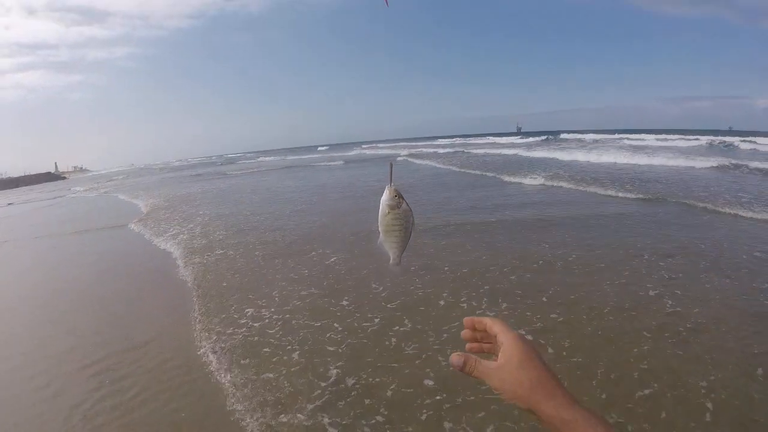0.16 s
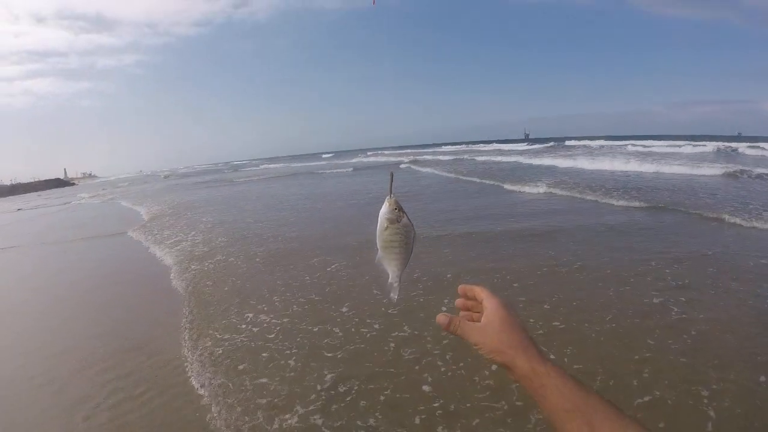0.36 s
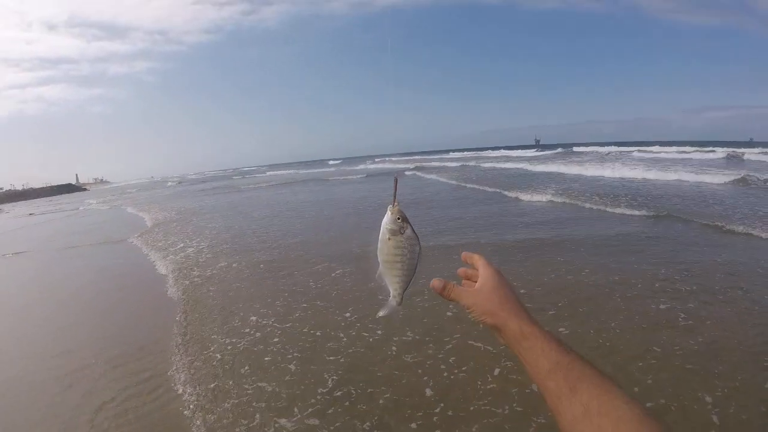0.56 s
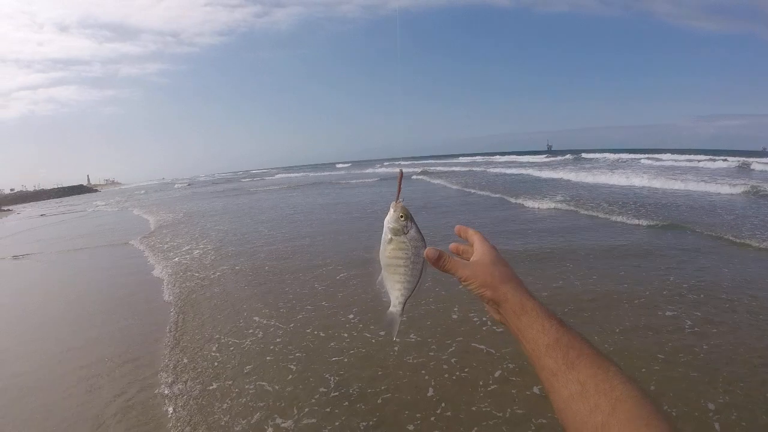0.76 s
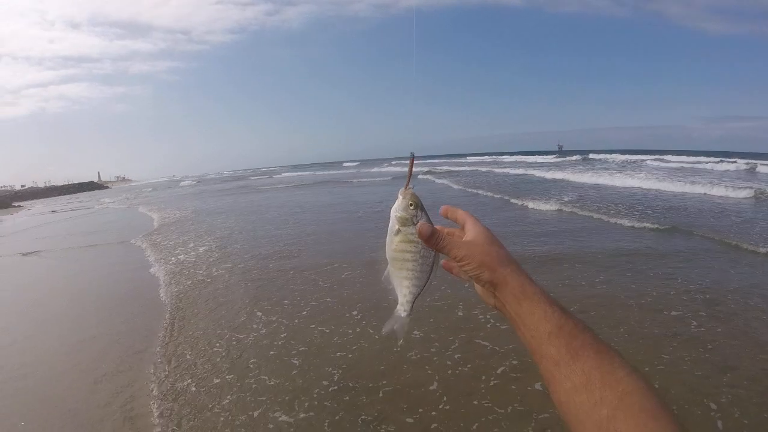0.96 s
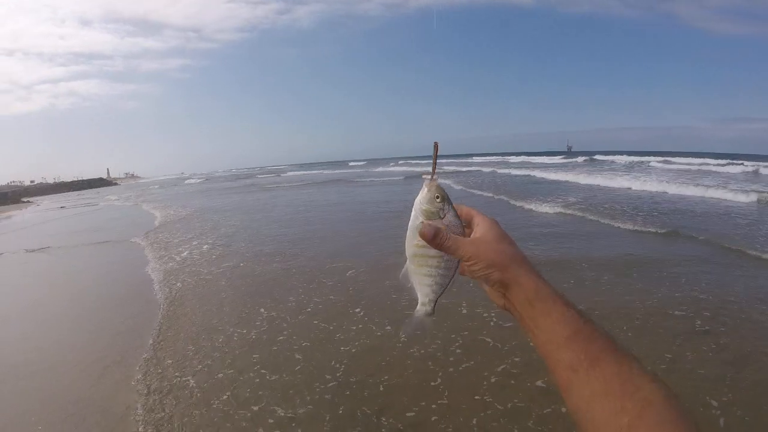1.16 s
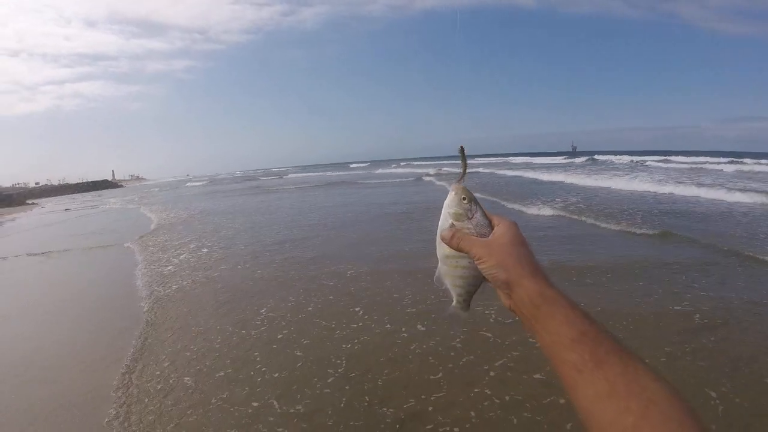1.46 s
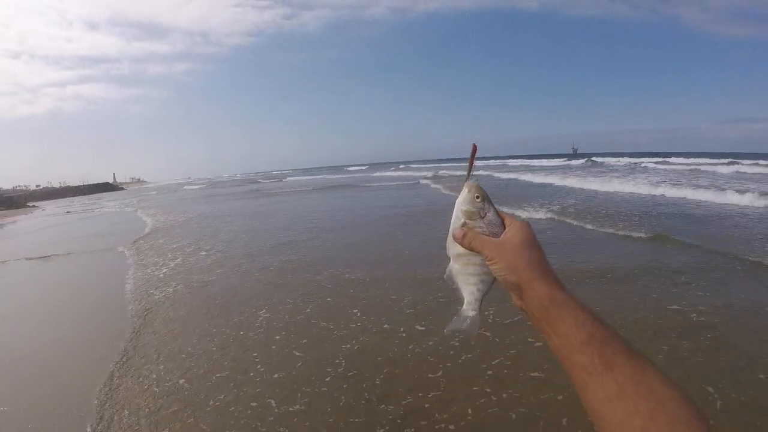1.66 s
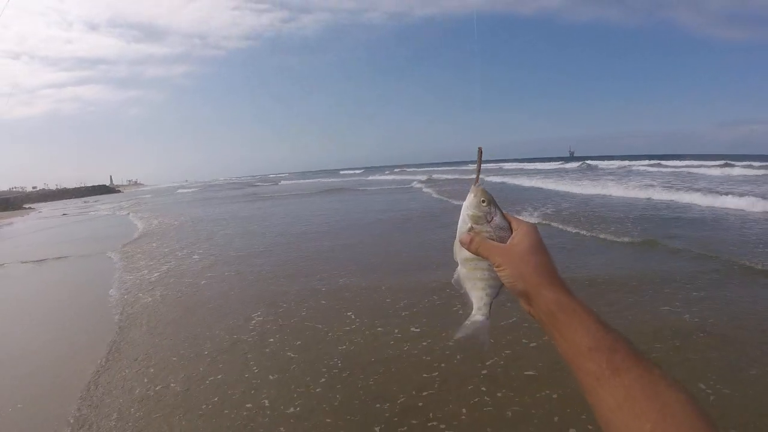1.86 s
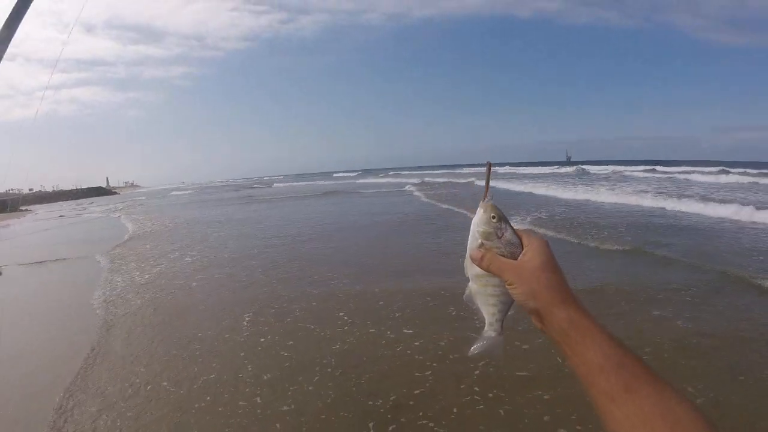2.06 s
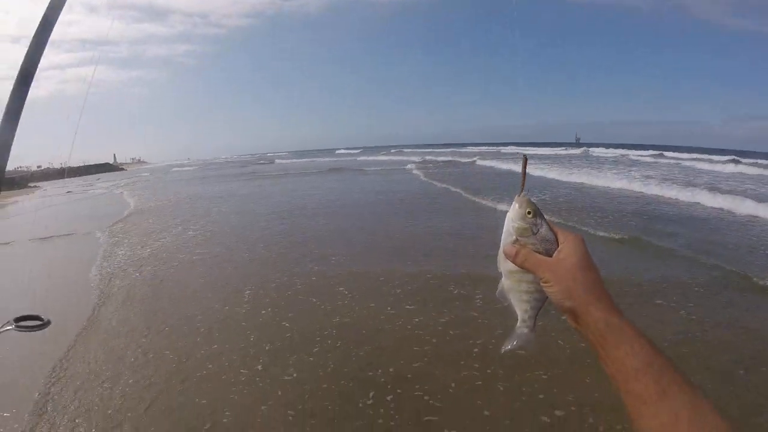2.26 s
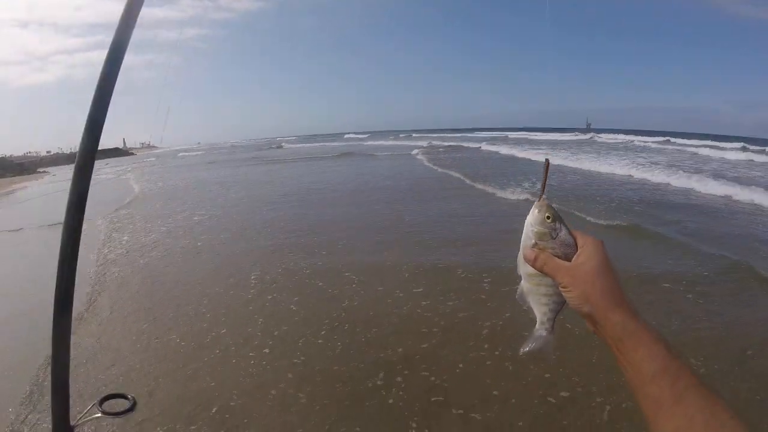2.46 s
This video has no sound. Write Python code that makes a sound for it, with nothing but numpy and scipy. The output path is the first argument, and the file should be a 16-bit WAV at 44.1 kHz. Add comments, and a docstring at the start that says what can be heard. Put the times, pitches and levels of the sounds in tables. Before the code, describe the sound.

Heavy wind rumble and rapid bumps on the microphone, with dull surf roar and a fading foam wash

```python
"""A flat sandy beach, heard at the water's edge through a microphone in a housing.
Far breakers roar steadily as churning noise; a thin sheet of foam washes in, fizzes and fades.
The fizz is a crowd of tiny ringing bubbles. Wind rumbles on the microphone port, where eddies
strike as low, fluttering bumps and small ones burst in sharp puffs, all shaped from noise."""
import sys
import numpy as np
from scipy import signal
from scipy.fft import rfft, irfft
from scipy.io import wavfile
from scipy.ndimage import map_coordinates

SR = 44100
rng = np.random.default_rng(int(sys.argv[2]) if len(sys.argv) > 2 else 0)


def file_out(sig):
    """Save sig as 16-bit WAV at sys.argv[1]."""
    # one column per channel
    cols = np.atleast_2d(sig).T
    # limit, then scale
    lim = np.clip(cols, -1, 1)
    pcm = np.round(lim * 32767).astype(np.int16)
    wavfile.write(sys.argv[1], SR, pcm)


N = 114660  # length in samples

# Spectrum of the far breakers. Each row: frequency in Hz, relative density in dB per Hz.
BREAKER_SPECTRUM = [(40, -4), (150, 3.5), (450, -4), (800, -8.5), (1500, -12), (2800, -19.5), (4200, -23.5),
                    (7000, -26.5), (11000, -26.5), (15000, -35)]
# Spectrum of foam washing over sand. Each row: frequency in Hz, relative density in dB per Hz.
WASH_SPECTRUM = [(150, 5), (500, 5.5), (1000, -0.5), (1800, -4), (2900, -9), (4200, -16), (7000, -18),
                 (11000, -16), (15000, -20)]
# Strength of the wash as it comes and goes. Each row: time in seconds, level in dB.
WASH_STRENGTH = [(0, -34.5), (.13, -32), (.27, -32.5), (.42, -29.5), (.76, -27.5), (.93, -31),
                 (1.05, -34.5), (1.24, -32.5), (1.46, -38.5), (1.7, -50), (1.92, -41.5), (2.15, -48),
                 (2.48, -36.5), (2.6, -40)]
# Spectrum of steady wind on the port. Each row: frequency in Hz, relative density in dB per Hz.
RUMBLE_SPECTRUM = [(10, -25.5), (24, -2.5), (34, 1.5), (52, 0), (80, -5.5), (130, -14.5), (220, -21),
                   (400, -35), (1000, -64.5)]
# Strength of the wind rumble. Each row: time in seconds, level in dB.
WIND_STRENGTH = [(0, -26), (.1, -19.5), (.36, -20.5), (.55, -12.5), (.75, -16.5), (.87, -19), (1.0, -13),
                 (1.17, -17.5), (1.3, -13.5), (1.6, -13), (1.79, -17), (1.94, -9.5), (2.06, -19),
                 (2.17, -23.5), (2.37, -22.5), (2.52, -11.5), (2.6, -19)]
# Spectrum of an eddy's thud. Each row: frequency in Hz, relative density in dB per Hz.
THUD_SPECTRUM = [(12, 4), (35, 2), (70, 1), (130, 0), (200, -8.5), (320, -16.5), (600, -36), (1500, -58)]
# Spectrum of an eddy's flutter. Each row: frequency in Hz, relative density in dB per Hz.
FLUTTER_SPECTRUM = [(100, 4), (250, 2.5), (420, -1.5), (700, -9.5), (1200, -26.5), (2000, -37.5),
                    (4000, -51)]
# Eddies striking the port. Each row: middle in seconds, half-length in seconds,
# thud level in dB, flutter level in dB.
EDDIES = [(0.064, 0.024, -21.5, -39), (.128, 0.022, -13, -31), (0.247, 0.019, -18.5, -32),
          (0.307, 0.029, -13.5, -34), (0.396, 0.017, -16, -39), (0.463, 0.014, -19, -30),
          (0.621, 0.03, -20.5, -28), (0.705, .04, -13, -42), (0.771, 0.023, -11, -39),
          (0.816, 0.028, -8, -17), (0.914, 0.029, -10.5, -20.5), (0.992, 0.02, -8.5, -15.5),
          (1.063, 0.034, -17, -32), (1.101, 0.027, -13.5, -29), (1.248, 0.039, -11, -23.5),
          (1.306, 0.02, -12.5, -22.5), (1.327, 0.013, -7, -28), (1.363, 0.016, -27, -21),
          (1.405, 0.026, -14, -18.5), (1.532, 0.042, -13.5, -21), (1.573, 0.016, -13.5, -49),
          (1.613, 0.031, -8.5, -35), (1.698, 0.034, -13, -36), (1.736, 0.046, -10, -24.5),
          (1.816, 0.021, -10.5, -26), (1.847, 0.021, -14.5, -34), (1.901, 0.034, -11.5, -32),
          (1.949, 0.025, -12, -28), (1.995, 0.04, -12, -19.5), (2.037, 0.019, -7, -27),
          (2.097, 0.019, -8.5, -33), (2.187, 0.019, -22, -36), (2.243, 0.022, -15, -29.5),
          (2.272, 0.012, -7.5, -32), (2.466, 0.031, -11, -20), (2.498, 0.017, -9.5, -50),
          (2.542, 0.023, -37, -29.5), (2.565, 0.02, -10, -22)]
# Small eddies bursting in the port. Each row: start in seconds, peak level in dB.
PUFF_EVENTS = [(0.124, -22.5), (1.512, -24.5), (1.601, -20.5), (1.663, -27), (1.731, -19), (1.923, -27),
               (1.94, -19), (1.986, -22.5), (2.035, -24.5)]
# Spectrum of a puff. Each row: frequency in Hz, relative density in dB per Hz.
PUFF_SPECTRUM = [(150, -6), (400, 2.5), (750, 5), (1200, -8.5), (1700, -18), (3000, -26), (6000, -42)]
# Colour of the microphone housing. Each row: frequency in Hz, gain in dB.
HOUSING_RESPONSE = [(6, -24), (18, 0.5), (3000, 1.5), (3900, -0.5), (4400, -0.5), (5000, 3.5), (5800, 2.5),
                    (6600, -6.5), (8500, -10.5), (10600, -14.5), (11600, -28.5), (12600, -25), (13600, -25),
                    (15000, -28)]

BREAKERS_DB = -31
# Water's random level: depth in dB and turns per second
SWELL_DB, SWELL_PER_S, FLICKER_DB, FLICKER_PER_S = -0.2, 5.65, 0.57, 18
BUBBLES_PER_S, BUBBLE_HZ, BUBBLE_CYCLES = 1100, (1175, 8800), 8.4
BUBBLE_RANGE_DB, BUBBLE_DB = 24, -14.5  # loudest to faintest; fizz relative to the wash
FLUTTER_ROUGH_DB, FLUTTER_PER_S = 2, 250
PORT_LIMIT = 0.98  # pressure at which the wind overloads the port (full scale 1)
PUFF_RISE_S = 0.0017
EVENNESS = 0.68  # how far chance swells are pressed out of a thud or puff (0-1)
TOP_HZ = 14600


def undb(db):
    """Decibels to gain."""
    return 10 ** (np.asarray(db) / 20)


def unit(x):
    """Scale to rms 1."""
    return x / np.sqrt(np.mean(x ** 2))


def curve(rows):
    """Gain over time from (s, dB) rows."""
    return undb(np.interp(np.arange(N) / SR, *np.array(rows).T))


def colour(x, points):
    """Filter by (Hz, dB) points, joined on a log frequency scale."""
    hz, db = np.array(points).T
    f = np.maximum(np.arange(N // 2 + 1) * SR / N, 1)
    gain = undb(np.interp(np.log(f), np.log(hz), db))
    return irfft(rfft(x) * gain, N)


def noise(points):
    """Noise of rms 1 with the given spectrum."""
    return unit(colour(rng.standard_normal(N), points))


def walk(rate):
    """Smooth chance with spread near 1 that turns about rate times a second."""
    knots = rng.standard_normal(4096)
    return map_coordinates(knots, [np.arange(N) / SR * rate], order=3, mode="mirror")


def churn(points, count=9):
    """Tumbling water: octave bands that swell together and flicker alone."""
    water = rfft(noise(points))
    swell = SWELL_DB * walk(SWELL_PER_S)
    bins = np.maximum(np.arange(len(water)), 1)
    octave = np.clip(np.log2(N / 2 / bins), 0, count - 1)  # octaves down from the top
    out = np.zeros(N)
    for k in range(count):
        band = irfft(water * np.maximum(1 - abs(octave - k), 0), N)  # overlapping triangles
        out += band * undb(swell + FLICKER_DB * walk(FLICKER_PER_S))
    return unit(out)


def breakers():
    """Far surf: many tumbling crests blur into one steady, dark roar."""
    return undb(BREAKERS_DB) * churn(BREAKER_SPECTRUM)


def bubbles():
    """Tiny foam bubbles, each a decaying sine of a few cycles at its own pitch and level."""
    out = np.zeros(2 * N)  # room for the last rings
    for when, size, luck in rng.random((int(BUBBLES_PER_S * N / SR), 3)):
        hz = BUBBLE_HZ[0] * (BUBBLE_HZ[1] / BUBBLE_HZ[0]) ** size
        cycle = np.arange(int(BUBBLE_CYCLES * SR / hz)) * hz / SR
        decay = np.exp(-np.log(100) * cycle / BUBBLE_CYCLES)  # down 40 dB by the end
        ring = np.sin(2 * np.pi * cycle) * decay
        start = int(when * N)
        out[start:start + len(ring)] += ring * undb(-BUBBLE_RANGE_DB * luck)
    return unit(out[:N])


def wash():
    """Near foam: churning water and bubble fizz rise and fade together."""
    foam = churn(WASH_SPECTRUM) + undb(BUBBLE_DB) * bubbles()
    return curve(WASH_STRENGTH) * foam


def even(points):
    """Noise that keeps its wandering pitch but holds a steadier strength."""
    x = noise(points)
    strength = abs(signal.hilbert(x))
    return unit(x / (strength + 0.12) ** EVENNESS)


def rumble():
    """Steady wind on the port: low noise that follows the wind's strength."""
    return curve(WIND_STRENGTH) * noise(RUMBLE_SPECTRUM)


def eddies():
    """Each eddy swells and dies on the port as a low thud with ragged flutter."""
    t = np.arange(N) / SR
    thud_level, flutter_level = np.zeros(N), np.zeros(N)
    for middle, half_length, thud_db, flutter_db in EDDIES:
        swell = np.cos(np.pi / 2 * np.clip((t - middle) / half_length, -1, 1)) ** 2
        thud_level += undb(thud_db) * swell
        flutter_level += undb(flutter_db) * swell
    roughness = undb(FLUTTER_ROUGH_DB * walk(FLUTTER_PER_S))
    ragged = unit(noise(FLUTTER_SPECTRUM) * roughness)
    return thud_level * even(THUD_SPECTRUM), flutter_level * ragged


def wind():
    """The port rounds the peaks of rumble and thuds; flutter rides on top unrounded."""
    thuds, flutter = eddies()
    pressure = rumble() + thuds
    return PORT_LIMIT * np.tanh(pressure / PORT_LIMIT) + flutter


def puffs():
    """Small eddies burst as brief, brighter spits of air: a quick rise and a short tail."""
    t, envelope = np.arange(N) / SR, np.zeros(N)
    for start, db in PUFF_EVENTS:
        age = np.maximum(t - start, 0) / PUFF_RISE_S
        envelope += undb(db) * age * np.exp(1 - age)  # peaks at age 1
    return envelope * even(PUFF_SPECTRUM)


def scene():
    """Wind at the microphone over the surf, in one channel."""
    return (breakers() + wash() + wind() + puffs())[None]


def record(dry):
    """The housing colours the sound and the recorder steeply cuts the top."""
    heard = np.array([colour(channel, HOUSING_RESPONSE) for channel in dry])
    top_cut = signal.ellip(8, .2, 80, TOP_HZ, fs=SR, output="sos")
    return signal.sosfilt(top_cut, heard)


dry = scene()
out = record(dry)
file_out(out)
```